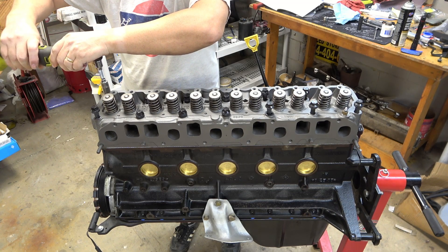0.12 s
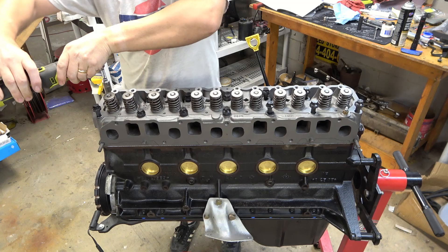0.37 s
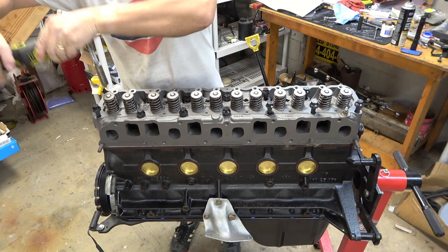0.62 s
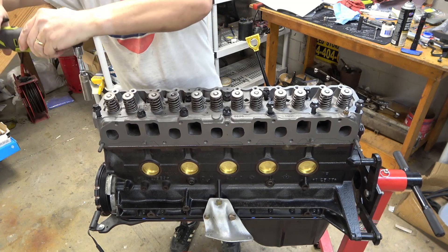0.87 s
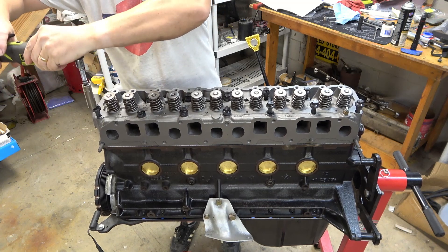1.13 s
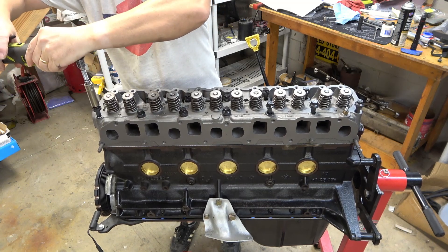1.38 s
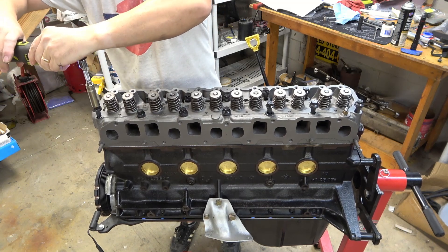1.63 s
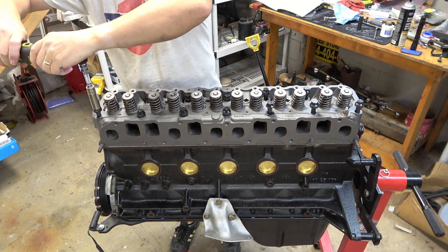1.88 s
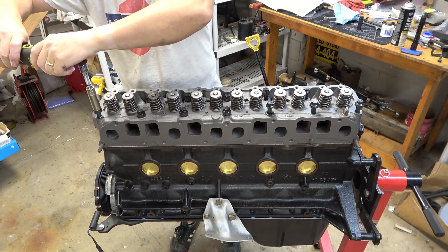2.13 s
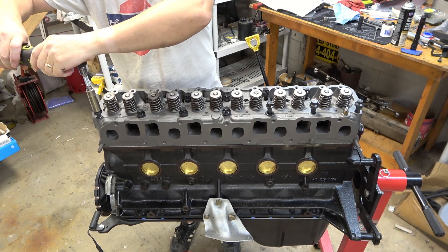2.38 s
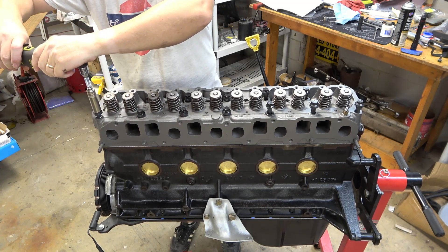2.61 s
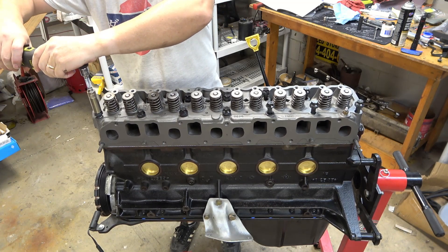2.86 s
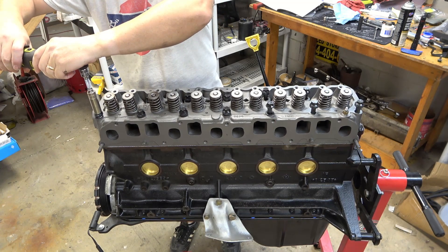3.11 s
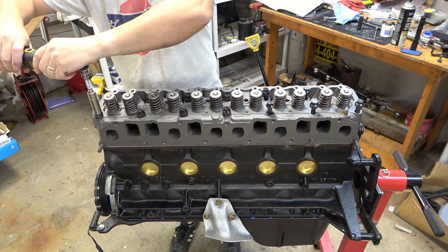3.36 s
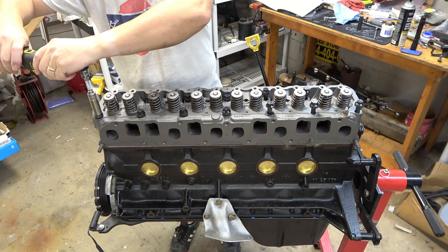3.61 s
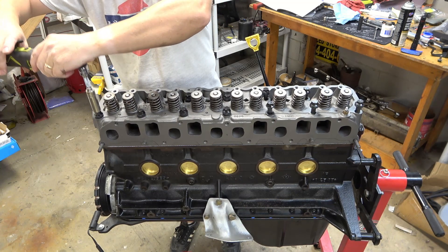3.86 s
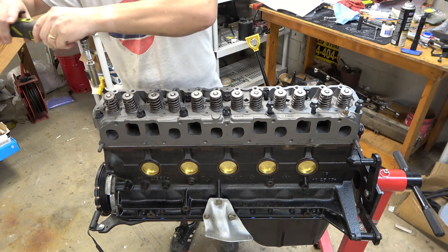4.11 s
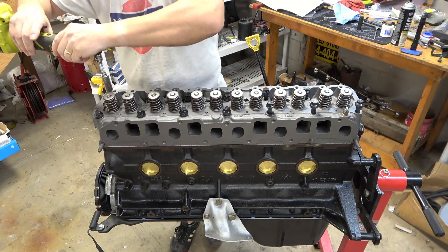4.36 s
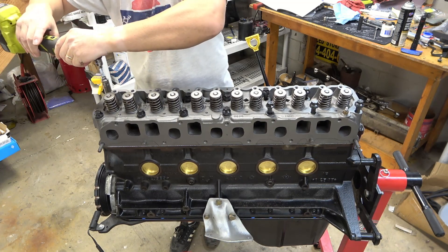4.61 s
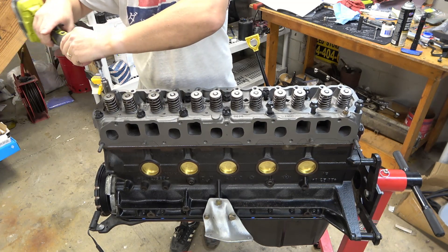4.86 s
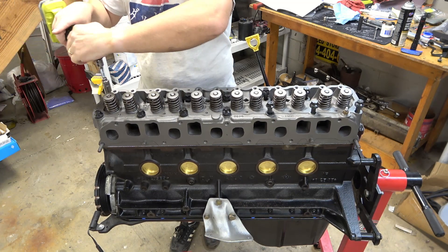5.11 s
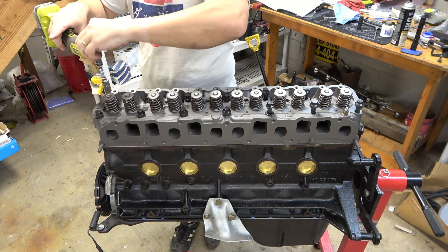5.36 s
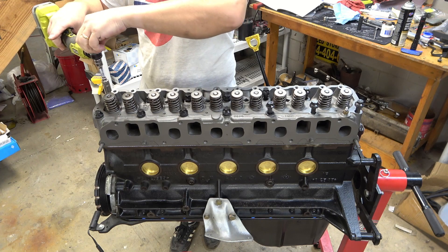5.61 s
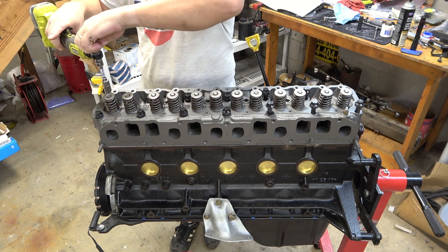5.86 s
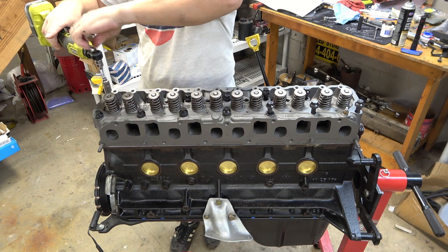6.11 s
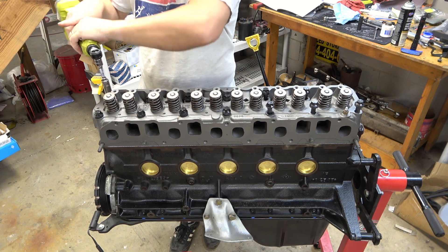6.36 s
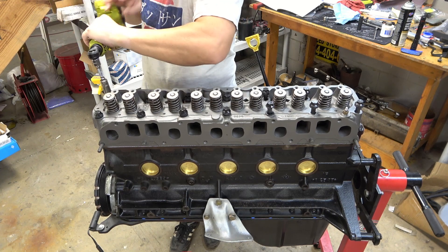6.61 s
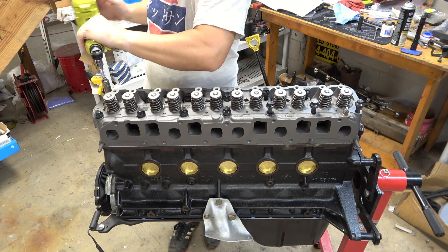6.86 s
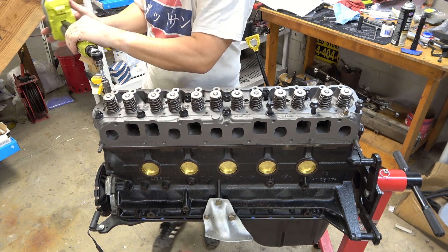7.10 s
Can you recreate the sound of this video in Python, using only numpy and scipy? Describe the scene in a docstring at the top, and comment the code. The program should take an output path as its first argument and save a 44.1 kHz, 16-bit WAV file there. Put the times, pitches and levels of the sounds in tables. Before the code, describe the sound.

Close up in a hard-walled home workshop, a cordless ratchet is caught finishing a loaded burst, sagging quickly into a low growl. Socket clanks ring on steel, then the tool spins up into a harsh, bright, rattling two-second run and cuts off abruptly. Afterwards come scattered clicks, clanks and tiny springy pings over faint hum and hiss.

```python
"""A cordless ratchet in a home workshop: the end of a loaded burst, clicks of socket and pawl, a two-second run.
A geared motor swings a crank; each turn the yoke knocks a few times and the pawl pings on its wheel, over gear
grind, the shaken housing and crank tones. Blows on the bolt ring a steel body, and a small spring is plucked.
A hard-walled room answers; a low hum and handling rustle lie underneath.
Two close microphone ports add faint hiss and mild clipping."""
import sys
import numpy as np
from scipy import signal
from scipy.fft import rfft, irfft, next_fast_len
from scipy.io import wavfile
from scipy.ndimage import uniform_filter1d, map_coordinates

SR = 44100
rng = np.random.default_rng(int(sys.argv[2]) if len(sys.argv) > 2 else 0)


def waveform_to_disk(signal):
    """Save audio, clipped to [-1, 1], as 16-bit WAV at the path in sys.argv[1]."""
    frames = np.transpose(np.atleast_2d(signal))
    scaled = np.clip(frames, -1, 1) * 32767
    samples = np.round(scaled).astype(np.int16)
    wavfile.write(sys.argv[1], SR, samples)


def to_linear_factor(level_db):
    """Convert decibel levels (scalar or array-like) to linear amplitude factors."""
    exponent = np.asarray(level_db, float) / 20
    return 10 ** exponent


N = 318843
T = np.arange(N) / SR

# trigger held, one list for each run; the last row ends the run:
# (t/s, yoke and grind level/dB, load from 0 to 1, pawl level/dB), levels before the mix trims
RUNS = [
    [(0, -14.5, 0.6, -26.5), (.08, -14.5, 0.72, -20), (.16, -16.5, 0.86, -20.5), (.19, -16, 0.94, -37),
     (.275, -13.5, 0.62, -39), (.295, -18, .7, -45), (.325, -28, .7, -62)],
    [(1.672, -44.5, .05, -47.5), (1.716, -26, .05, -39.5), (1.725, -31, .1, -25), (1.75, -18.5, 0.3, -18.5),
     (1.8, -15.5, .1, -19), (2.6, -15.5, 0.2, -17.5), (3.6, -15.5, 0.1, -19.5), (3.715, -16.5, 0.17, -25),
     (3.732, -18.5, 0.7, -23)],
]
# socket clanks on the bolt, then seats; the spot struck favours a pitch:
# (t/s, clank level/dB, ring level/dB, seat ring level/dB, favoured f/Hz)
CLANKS = [(1.1626, -21.5, -18, -39, 4670), (1.3265, -19.5, -22, -31, 4530), (1.67, -31, -31, -55, 3880),
          (1.6964, -25, -33, -42, 3850), (1.721, -12, -29.5, -35, 4000), (4.4764, -28, -50, -37, 5300),
          (4.5316, -22.5, -30, -33, 5600), (4.5941, -18.5, -23.5, -33.5, 3810),
          (4.9192, -23, -30, -31, 1540), (6.5386, -24.5, -36.5, -42, 4830), (6.5523, -27.5, -30, -50, 4850)]
# a small spring plucked as the tool is handled: (t/s, ring level/dB, tick level/dB)
PLUCKS = [(4.96, -53, -47.5), (5.158, -44.5, -47), (5.9174, -52, -44.5), (6.2788, -47, -50.5),
          (6.2854, -56, -50.5), (6.2955, -44.5, -47), (6.3016, -57, -49.5), (6.3119, -39, -50),
          (6.3224, -44, -51), (6.654, -42.5, -59), (6.785, -40.5, -52.5), (6.8139, -52, -64),
          (6.8368, -60, -62.5), (6.9424, -54, -62)]

SEAT_S = .005  # the socket seats this long after its clank
CONTACT_T = T[:SR // 4]  # time within one contact
SOFT_START = 1 - np.exp(-CONTACT_T / 0.00042)  # heavy parts meet less sharply than the pawl


def unit(x):
    """Scale to rms 1."""
    return x / np.sqrt(np.mean(x ** 2) + 1e-20)


def along(points, hz):
    """Read a curve of (Hz, value) points on a log frequency axis."""
    f, v = np.transpose(points)
    return np.interp(np.log(hz + 1), np.log(f + 1), v)


def curves(rows):
    """One value per sample for each column after the time."""
    s, *cols = np.transpose(rows)
    return [np.interp(T, s, c) for c in cols]


def waver(rate, t=T):
    """A smooth random curve through new random values, rate of them a second."""
    return map_coordinates(rng.standard_normal(int(t[-1] * rate) + 20), [t * rate])


def filtered(x, response):
    """Multiply the spectrum of x by a response that depends on frequency."""
    m = next_fast_len(x.shape[-1] + 8192)
    return irfft(rfft(x, m) * response(np.fft.rfftfreq(m, 1 / SR)), m)[..., :x.shape[-1]]


def colour(points):
    """Response of a filter drawn as (Hz, dB) points."""
    return lambda hz: to_linear_factor(along(points, hz))


def resonant(modes):
    """Causal response of (Hz, width Hz, dB) resonances with alternating signs."""
    def response(f):
        total = 0
        for k, (centre, width, db) in enumerate(modes):
            damping = 1j * f * width
            total = total + (-1) ** k * to_linear_factor(db) * damping / (centre * centre - f * f + damping)
        return total
    return response


def spread(pair, response):
    """Mix two unrelated signals to left and right with the likeness of diffuse sound."""
    # left-right likeness: (f/Hz, likeness from -1 to 1)
    likeness = [(60, 0.89), (180, 0.97), (550, 0.96), (1650, 0.99), (4970, 0.45), (15000, -0.1)]
    turn = lambda hz: np.arccos(np.clip(along(likeness, hz), -1, 1)) / 2
    mid, side = filtered(pair, lambda hz: response(hz) * np.array([np.cos(turn(hz)), np.sin(turn(hz))]))
    return np.array([mid + side, mid - side])


def laid(times, shapes):
    """Sum one short shape (a row) at each time."""
    at = np.round(times * SR).astype(int)[:, None] + np.arange(shapes.shape[1])
    return np.bincount(at.ravel(), shapes.ravel(), N + SR)[:N]


def ring(modes, scatter_db):
    """One blow on (Hz, dB, t60 s) modes, each at a new strength and fluttering in the loose fit."""
    t = CONTACT_T
    total = np.zeros(len(t))
    for hz, db, t60 in modes:
        fading = to_linear_factor(db + scatter_db * rng.normal() - 60 * t / t60)
        total += fading * (1 + 0.51 * waver(150, t)) * np.sin(2 * np.pi * hz * t)
    return total


def background():
    """A low hum, a faint rustle and hands on the grip waver; narrow drones follow the level of the hum."""
    # (t/s, hum level/dB, rustle level/dB)
    air = [(0, -49.5, -46), (1.1, -48.5, -48.5), (2.5, -55.5, -47), (3.65, -51, -56.5), (3.8, -50, -52.5),
           (4.6, -48.5, -51), (5.6, -52, -51.5), (6.5, -52, -51), (7.23, -52.5, -50)]
    # hum colour: (f/Hz, relative level/dB per Hz)
    hum_colour = [(12, -61), (20, -25.5), (32, -19), (59, -0.5), (87, 3), (102, 0), (119, -5.5), (214, 1),
                  (238, -6.5), (270, -6), (330, -6), (430, -48), (730, -120)]
    # rustle colour: (f/Hz, relative level/dB per Hz)
    rustle_colour = [(150, -27.5), (250, -16), (282, -8.5), (393, -4.5), (484, -6.5), (557, -7.5),
                     (662, -3), (735, -6), (1180, -5.5), (2960, -20.5), (4730, -25), (5630, -25.5),
                     (16000, -43)]
    # narrow bands of noise: (f/Hz, width/Hz, level/dB at the average hum level)
    drone_bands = [(94.4, 6, -61.5), (202, 6, -65), (692, 11, -63.5), (4860, 60, -72.5)]
    # skin sliding on the grip: (t/s, level/dB)
    hands_level = [(6.6, -90.5), (6.9, -58.5), (7.07, -56), (7.23, -66.5)]
    skin_colour = [(500, -32), (1200, -2), (5000, -4.5), (8000, -10.5), (14000, -29)]
    noise = lambda response: unit(spread(rng.standard_normal((2, N)), response))
    hum_db, rustle_db = curves(air)
    hum = to_linear_factor(hum_db + 0.35 * waver(5)) * noise(colour(hum_colour))
    rustle = to_linear_factor(rustle_db + 1.3 * waver(2.7)) * noise(colour(rustle_colour))
    hands = to_linear_factor(curves(hands_level)[0] + 2.5 * waver(40)) * noise(colour(skin_colour))
    drones = sum(to_linear_factor(db) * noise(resonant([(hz, width, 0)])) for hz, width, db in drone_bands)
    return hum + rustle + hands + drones * to_linear_factor(hum_db - np.mean(hum_db))


def room(x):
    """Each frequency of the workshop's answer dies at its own speed; the tail differs as the tool moves."""
    # decay: (f/Hz, time to fall by 60 dB/s)
    decay = [(200, 0.93), (530, 0.69), (1400, 0.87), (3700, 0.66), (9700, 0.45), (15000, 0.35)]
    out, step = np.zeros((2, N + 2 * SR)), SR // 3  # a new tail every third of a second
    x = np.concatenate([x[:step][::-1], x])  # the tool was already running, so the room starts full
    for at in range(0, len(x), step):
        hz, t, z = signal.stft(rng.standard_normal((2, SR * 3 // 4)), SR, nperseg=256)
        tail = signal.istft(z * to_linear_factor(-60 * t / along(decay, hz)[:, None]), SR, nperseg=256)[1]
        wet = signal.fftconvolve(x[None, at:at + step], tail / np.linalg.norm(tail[0]), axes=1)
        out[:, at + 200:at + 200 + wet.shape[1]] += wet  # answers 200 samples late
    return spread(out[:, step:step + N], colour([(300, 0.25), (3000, -0.51), (12000, -0.83)]))


def nearby(x):
    """Block and bench echo the treble within milliseconds, unlike at each port, drawn afresh every 2048 samples."""
    out, step = np.zeros((2, N + SR)), 2048
    for at in range(0, N, step):
        taps = rng.standard_normal((2, 400)) * to_linear_factor(-60 * T[:400] / 0.011)
        echo = signal.fftconvolve(x[None, at:at + step], taps / np.linalg.norm(taps, axis=1)[:, None], axes=1)
        out[:, at:at + echo.shape[1]] += echo
    return filtered(out[:, :N], colour([(600, -51.0), (1500, -32.5), (4000, -11.5), (13000, -7.5)]))


def stand():
    """Low tones linger and fade after the long run stops, likely the engine stand humming."""
    # (f/Hz, level/dB, time to fall by 60 dB/s)
    tones = [(94, -49, 5), (207, -48, 2)]
    t = np.maximum(T - RUNS[-1][-1][0], 0)  # zero, so silent, until the run stops
    return sum(to_linear_factor(db - 60 * t / t60) * to_linear_factor(2 * waver(8)) * np.sin(2 * np.pi * hz * t) for hz, db, t60 in tones)


def spring_rings():
    """A plucked spring rings at its own few pitches."""
    # (f/Hz, level/dB, time to fall by 60 dB/s)
    spring = [(6600, -1, .03), (7900, -1, .04)]
    rings = [to_linear_factor(db) * ring(spring, 2.7) for _, db, _ in PLUCKS]
    return laid(np.array([s for s, *_ in PLUCKS]) - .0003, np.array(rings))


def steel_rings():
    """Hard blows ring engine block, bolt and socket as one steel body, loudest near the favoured pitch."""
    # (f/Hz, level/dB, time to fall by 60 dB/s)
    steel = [(190, 0, .2), (400, 0, .3), (614, 0, .22), (840, -3, .2), (955, -4, .15), (1570, -3, .1),
             (2094, 0, .18), (2266, -3, .08), (2750, -1, .08), (3300, -1, .05), (3822, -2, .07),
             (4290, -1, .05), (4600, 0, .045), (4900, -2, .04), (5300, -4, .04), (6200, -5, .04)]
    # the motor jolts the block: (t/s, level/dB, favoured f/Hz)
    jolts = [(.086, -26, 191), (3.715, -24, 603), (3.72, -30.5, 400)]
    clanks = [(s, db, hz) for s, _, db, _, hz in CLANKS]
    seats = [(s + SEAT_S, db, hz * 0.45) for s, _, _, db, hz in CLANKS]  # seating favours a lower pitch
    blows = jolts + clanks + seats
    rings = []
    for _, db, favoured_hz in blows:
        modes = [(hz, level - 45 * np.log2(hz / favoured_hz) ** 2, t60) for hz, level, t60 in steel]
        rings.append(SOFT_START * to_linear_factor(db) * ring(modes, 1.0))
    return laid(np.array([s for s, *_ in blows]) - .0003, np.array(rings))


def contact_noises():
    """Every contact gives a thud, a clank and a tick: fading bursts of noise in higher and higher bands."""
    # pawl clicks: (t/s, tick level/dB, clank level/dB)
    clicks = [(.297, -25.5, -33.5), (.5537, -28.5, -29.5), (1.6514, -47.5, -41), (1.6796, -15.5, -45),
              (1.6881, -16.5, -40), (1.7164, -17, -33), (1.721, -13.5, -28.5), (4.4822, -19, -28.5),
              (5.9319, -16, -32.5), (6.3405, -19, -40.5), (6.4308, -18, -33.5), (6.5261, -19, -32.5),
              (6.6004, -19, -32)]
    # light taps of tool and hand: (t/s, thud level/dB, clank level/dB)
    taps = [(0.5705, -34, -31), (0.5968, -39, -38), (.757, -33.5, -40.5), (.812, -38, -49),
            (0.973, -41, -44), (1.6123, -56, -39), (3.998, -35.5, -43.5), (4.8943, -37, -41),
            (4.9824, -58.5, -50), (6.3484, -41, -34), (6.8835, -59, -49), (7.0793, -36, -52),
            (7.1672, -48, -47)]
    thud, tick = -8.5, -19.5  # dB over a socket clank
    seat = -9.5  # dB of the seat's clank over the socket clank
    # rows of (s, thud dB, clank dB, tick dB)
    hits = ([(s, db - 4.5, db, tick_db) for s, tick_db, db in clicks]
            + [(s, db + thud, db, db + tick) for s, db, *_ in CLANKS]
            + [(s + SEAT_S, db - 4.5, db + seat, db + seat + tick) for s, db, *_ in CLANKS]
            + [(s, thud_db, db, db - 17) for s, thud_db, db in taps]
            + [(s, db + thud, db, db) for s, _, db in PLUCKS])
    low, mid, high, pawl = (350, 2000), (1800, 6800), (4000, 15500), (10500, 13300)  # bands in Hz

    def burst(edges, t60):
        band = signal.butter(3, edges, "band", fs=SR, output="sos")
        return signal.sosfilt(band, to_linear_factor(-60 * CONTACT_T / t60) * rng.standard_normal(len(CONTACT_T)))

    rows = []
    for _, thud_db, clank_db, tick_db in hits:
        thud_noise = 1.5 * burst(low, 0.19)
        clank_noise = 2.34 * burst(mid, 0.024) + .5 * burst(mid, 0.18)
        tick_noise = 2.02 * burst(high, 0.0019) + 1.5 * burst(high, 0.0069)
        tick_noise += 2.7 * burst(pawl, .012) + 0.43 * burst(pawl, .09)
        heavy = to_linear_factor(thud_db) * thud_noise + to_linear_factor(clank_db) * clank_noise
        rows.append(SOFT_START * heavy + to_linear_factor(tick_db) * tick_noise)
    return laid(np.array([s for s, *_ in hits]) - .0003, np.array(rows))


def whine():
    """The speed controller sings in the windings: a short high whine at two, three and four times a base pitch."""
    # around the start of the long run: (start t/s, end t/s, base f/Hz)
    spans = [(1.634, 1.7, 1966)]
    # (multiple of the base, level/dB)
    multiples = [(2, -45.5), (3, -46.5), (4, -69.5)]
    out = np.zeros(N)
    for start, end, hz in spans:
        on = np.clip(np.minimum(T - start, end - T) / .003, 0, 1)
        out += on * sum(np.sqrt(2) * to_linear_factor(db) * np.sin(2 * np.pi * k * hz * T) for k, db in multiples)
    return out


def crank(held):
    """Speed and turns done, each run from its own starting angle; the turns grow only while held."""
    # sags as the bolt tightens; spins up and settles when free: (t/s, turns a second)
    speed_points = [(0, 69), (.07, 67.5), (.12, 57), (.2, 42), (.3, 32), (.34, 10), (1.67, 25), (1.72, 51),
                    (1.78, 72), (1.85, 81.5), (2.1, 80.6), (3.74, 80.11)]
    # crank angle as each run begins, in turns
    start_turn = [.19, .71]
    speed, = curves(speed_points)
    done = np.cumsum(held * speed + 1e-3) / SR  # the tiny creep keeps the count rising for lookups
    for run, turn in zip(RUNS, start_turn):
        done = done + (T >= run[0][0]) * ((turn - np.interp(run[0][0], T, done)) % 1)
    return speed, done


def moment(turn, done):
    """Time in seconds at which the crank reaches a turn."""
    return np.clip(np.interp(turn, done, T), 0, T[-1])


def crank_tones(done, load):
    """Steady tones at multiples of the crank's turning; more while the bolt still turns, then it binds."""
    # tones of the free run: (multiple, level/dB over the drone at no load)
    free_tones = [(4, -12), (5, -4.5)]
    # tones while the bolt still turns: (multiple, level/dB over the drone)
    bolt_tones = [(3, -21), (4, -13.5), (5, -17.5), (6, -12), (8, -13.5), (9, -7), (10, -10.5), (12, -8.5)]
    angle = 2 * np.pi * done
    free = sum(to_linear_factor(db - 37 * load + 2.4 * waver(9)) * np.sin(k * angle) for k, db in free_tones)
    bolt = sum(to_linear_factor(db) * np.sin(k * angle + 2 * np.pi * rng.random()) for k, db in bolt_tones)
    return free + np.exp(-(T / 0.076) ** 4) * bolt


def growl(speed, head_db):
    """A low resonance near 360 Hz growls, fuller as the crank nears a stall."""
    stall = 38  # turns a second at which the growl is fullest
    noise = unit(filtered(rng.standard_normal(N), lambda hz: resonant([(361.4, 44, 0)])(hz) ** 2))
    slow = np.clip((speed.max() - speed) / (speed.max() - stall), 0, 1)
    return noise * to_linear_factor(head_db - 22.5 + 11.5 * slow ** 2 + 3.5 * waver(6))


def housing_shake(blows):
    """Noise and the yoke's blows shake the resonances of housing and engine block."""
    # (f/Hz, width/Hz, relative level/dB)
    housing = [(296, 92, -7.5), (544, 66, -1), (619, 30, 3.5), (809, 96, 2), (974, 20, 3.5), (1043, 48, 3),
               (1180, 160, -3), (1365, 70, 2.5), (1570, 320, -10.5)]
    return filtered(rng.standard_normal(N) + 0.5 * unit(blows), resonant(housing))


def gear_grind():
    """Unevenly meshing gear teeth make rough noise, coloured by the gear case."""
    # gear teeth colour: (f/Hz, relative level/dB per Hz)
    teeth_colour = [(700, -46), (1200, -7.5), (1730, -9), (2970, -3.5), (3490, 0), (5150, -1.5),
                    (7670, -3.5), (10200, -5.5), (12100, -8), (15000, -24), (15800, -37)]
    # gear case resonances: (f/Hz, width/Hz, relative level/dB)
    gear_case = [(3720, 190, -3.5), (3830, 200, -10.5), (4200, 110, 1.5), (7600, 300, -10)]
    teeth = rng.standard_normal(N) * to_linear_factor(3.2 * waver(600))
    return filtered(teeth, lambda hz: to_linear_factor(along(teeth_colour, hz)) * np.abs(1 + resonant(gear_case)(hz) / 2))


def pawl_pings(done, load):
    """Once a turn the pawl skids onto a tooth and pings; the pitch climbs as a run gets going."""
    cold_hz, settled_hz, settle_s = 11600, 12194, .12
    which = np.searchsorted([run[-1][0] for run in RUNS[:-1]], T)
    since = T - np.array([run[0][0] for run in RUNS])[which]  # seconds since the run began
    pawl_hz = settled_hz - (settled_hz - cold_hz) * np.exp(-np.abs(since) / settle_s)
    turns = np.arange(1, int(done[-1]) + 1)
    t = T[:600]
    late, size, tune, wheel = rng.standard_normal((len(turns), 4)).T[:, :, None]
    at = moment(turns - .18 + 0.047 * late[:, 0], done)
    hz = np.interp(at, T, pawl_hz)[:, None] * (1 + 0.024 * tune)
    skid = (t / .0013) ** 2 * np.exp(-t / 0.00086) * to_linear_factor(1.1 * size)
    rough = 0.99 + 0.56 * unit(uniform_filter1d(rng.standard_normal((len(turns), len(t))), size=24))
    wheel_level = to_linear_factor(-2.5 + 2.2 * wheel - 10 * np.interp(at, T, load)[:, None])  # weaker under load
    wheel_tone = wheel_level * np.sin(2 * np.pi * (11100 + 250 * tune[::-1]) * t)
    return laid(at, skid * rough * (np.sin(2 * np.pi * hz * t) + wheel_tone))


def yoke_blows(done):
    """Several times a turn the yoke strikes: a short noise burst with a chime at one of the head's pitches."""
    # knocks of one turn: (place in the turn, relative level/dB, time scatter in turns)
    yoke = [(0.272, 5, .03), (0.581, -1, .06), (.85, -6.5, 0.091)]
    # short rings of the head, f/Hz; each knock favours one
    knock_hz = [3370, 3500, 4247, 5040, 6920, 7580, 8330]
    turns = np.arange(1, int(done[-1]) + 1)
    t = T[:600]
    blows = np.zeros(N)
    for place, db, scatter in yoke:
        late, size = rng.standard_normal((len(turns), 2)).T
        chime = np.sin(2 * np.pi * rng.choice(knock_hz, (len(turns), 1)) * t) * (1 - np.exp(-t / 0.00013))
        fading = to_linear_factor(db + 2.4 * size[:, None] - 60 * t / 0.0054)
        shapes = fading * (rng.standard_normal((len(turns), len(t))) + 0.95 * chime)
        blows += laid(moment(turns - 1 + place + scatter * late, done), shapes)
    return blows


def head_knocks(blows):
    """The steel head colours the yoke's blows."""
    # (f/Hz, relative level/dB per Hz)
    head_colour = [(700, -38), (1200, -15), (2100, -2.5), (2900, -10), (3450, 1), (4300, -2.5), (5200, -6),
                   (7600, -1), (10000, -2.5), (12100, -1.5), (13400, -6.5), (15000, -7), (15800, -36)]
    return filtered(blows, colour(head_colour))


def ratchet():
    """While the trigger is held: crank-timed knocks and pings, gear grind, shaken housing, tones and growl."""
    head_db, load, pawl_db = curves(np.vstack(RUNS))
    held = sum((T >= run[0][0]) & (T < run[-1][0]) for run in RUNS)
    speed, done = crank(held)
    which = np.searchsorted([run[-1][0] for run in RUNS[:-1]], T)
    # housing over the head in each run (on the bolt, free), rising with load
    drone_db = head_db + np.array([-6.5, -12.5])[which] + 7 * load
    blows = yoke_blows(done)
    knocks = unit(held * head_knocks(blows))
    grind = unit(held * gear_grind())
    pings = unit(held * pawl_pings(done, load))
    shake = unit(held * housing_shake(blows))
    head = to_linear_factor(head_db) * (to_linear_factor(-5.0) * knocks + to_linear_factor(-1.5) * grind)
    # a tight bolt takes up the play: deeper knocks, less treble
    dull = filtered(head, colour([(1200, 5.5), (2500, 8.0), (3600, 0), (7500, 4), (10500, -11.0)]))
    head = head + np.clip(load, 0, 1) * (dull - head)
    share = np.sqrt(np.mean(held))  # gives the layers rms 1 while the trigger is held
    layers = share * (head + to_linear_factor(pawl_db - 3.5) * pings + to_linear_factor(drone_db - 4.0) * shake)
    return held * (layers + to_linear_factor(drone_db) * crank_tones(done, load) + growl(speed, head_db))


def scene():
    """The tool reaches the left port 14 microseconds early; echoes, room and background join in."""
    # the case shades the ports: (f/Hz, left over right level/dB)
    shading = [(1500, 0), (4000, .7), (8000, 0), (12000, -1.6)]
    # tool direction: (t/s, left over right level/dB)
    direction = [(0, .4), (1.5, .1), (3.5, .1), (4.4, 1.5), (4.6, .4), (5, 0), (6.5, -.7)]
    motor = ratchet() + whine()
    contacts = contact_noises() + steel_rings() + spring_rings()
    side = np.array([[1], [-1]])
    ports = lambda hz: np.exp(1j * np.pi * hz * 14e-6 * side) * to_linear_factor(side * along(shading, hz) / 2)
    pan_db = curves(direction)[0] / 2
    direct = filtered(motor + contacts, ports) * to_linear_factor([pan_db, -pan_db])
    answer = room(to_linear_factor(-7.5) * motor + to_linear_factor(-12.0) * contacts)
    return direct + nearby(motor + contacts) + answer + background() + stand()


def low_pass(x):
    """Removes everything above the highest recorded frequency."""
    return signal.sosfilt(signal.butter(12, 16490, fs=SR, output="sos"), x)


def record(dry):
    """Microphone hiss, soft clipping near full scale and a falling top octave."""
    x = dry + to_linear_factor(-63.5) * rng.standard_normal(dry.shape)
    x = x / (1 + np.abs(x / .86) ** 5) ** (1 / 5)
    mix = filtered(x, lambda hz: to_linear_factor(along([(14800, 0.5), (15900, -9.5)], hz)) * (hz < 15900))
    return low_pass(mix)


dry = scene()
out = record(dry)
waveform_to_disk(out)
```